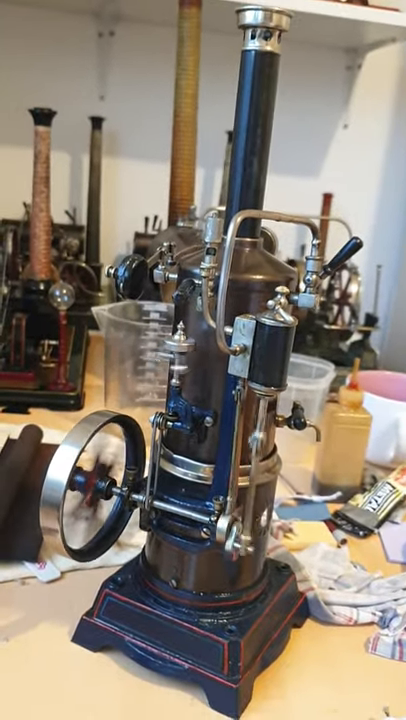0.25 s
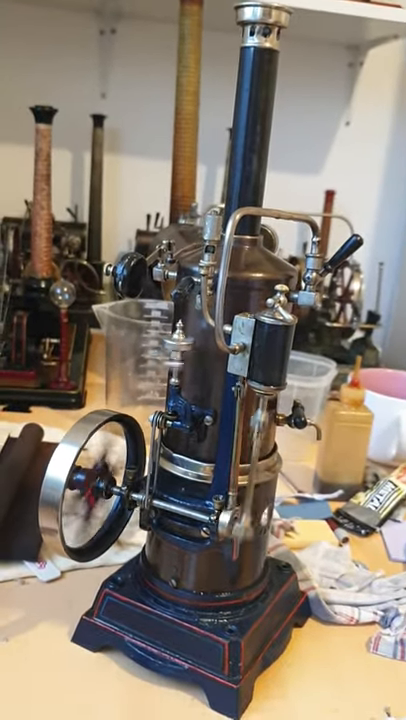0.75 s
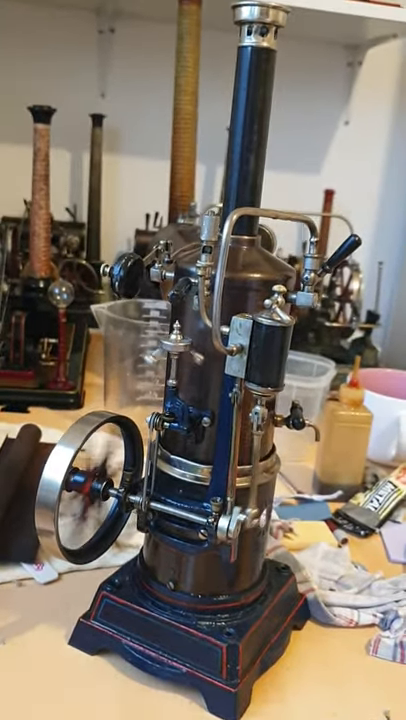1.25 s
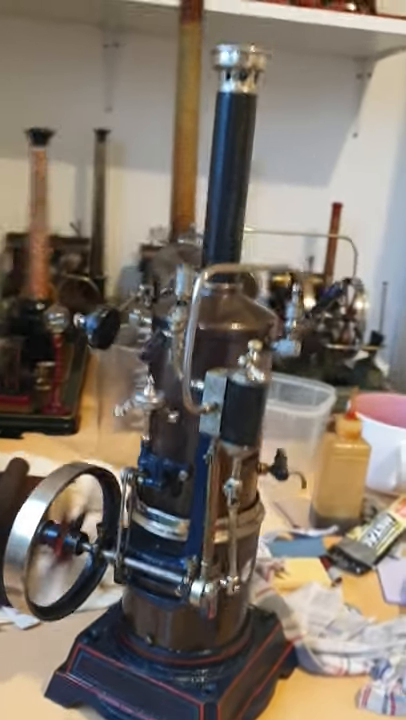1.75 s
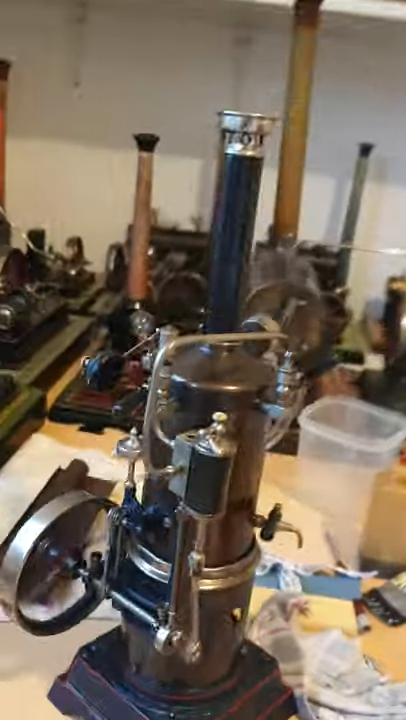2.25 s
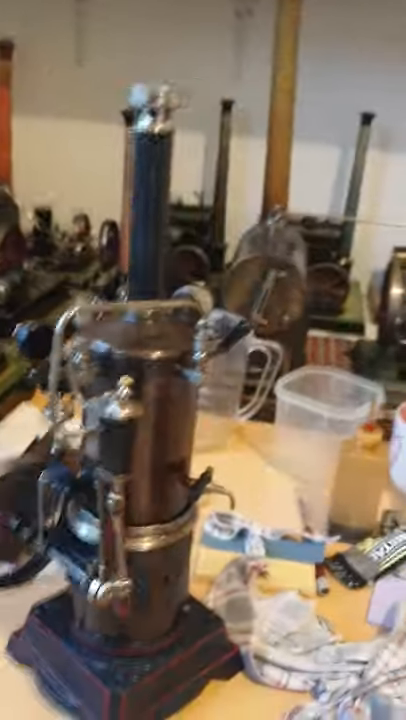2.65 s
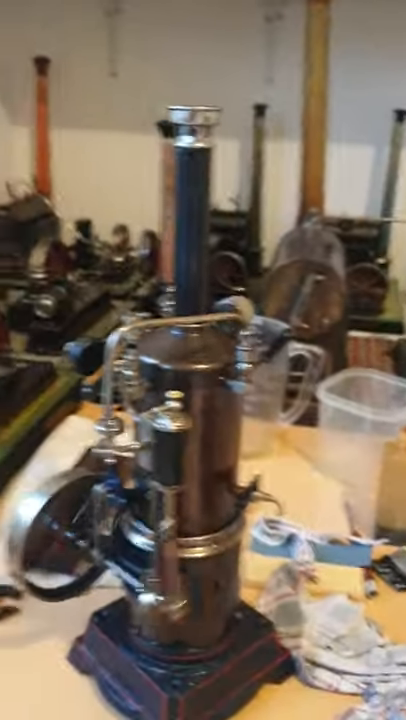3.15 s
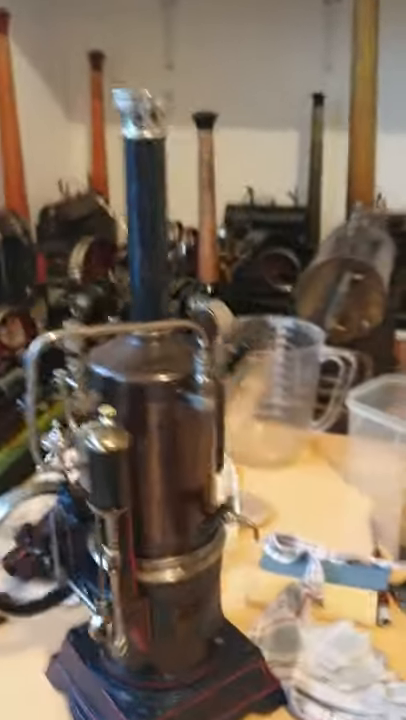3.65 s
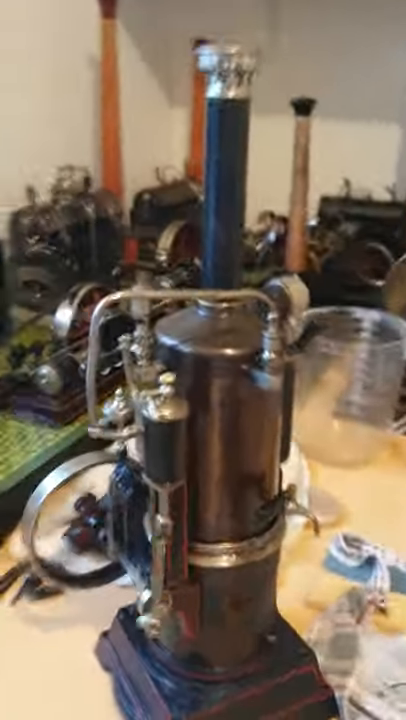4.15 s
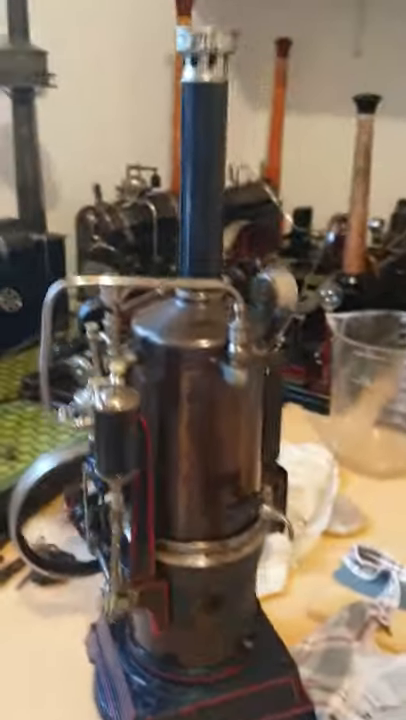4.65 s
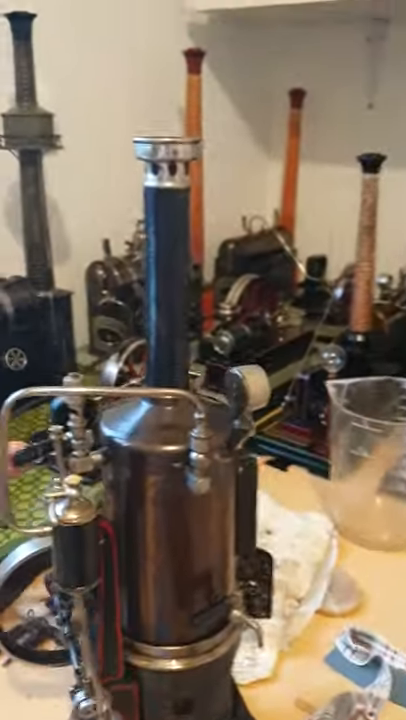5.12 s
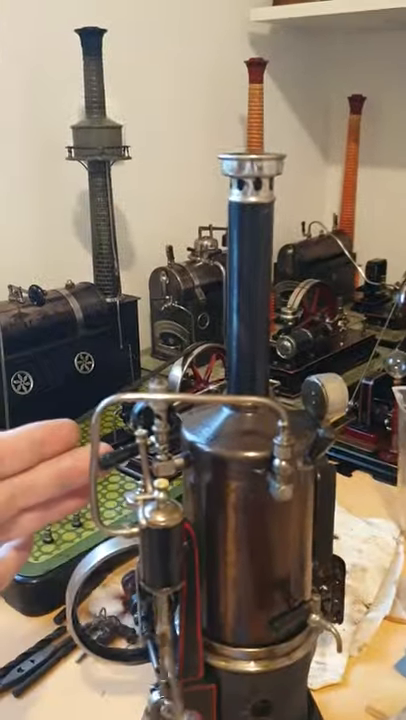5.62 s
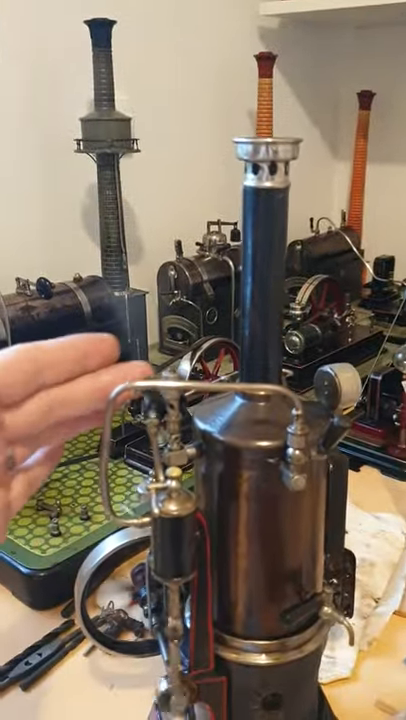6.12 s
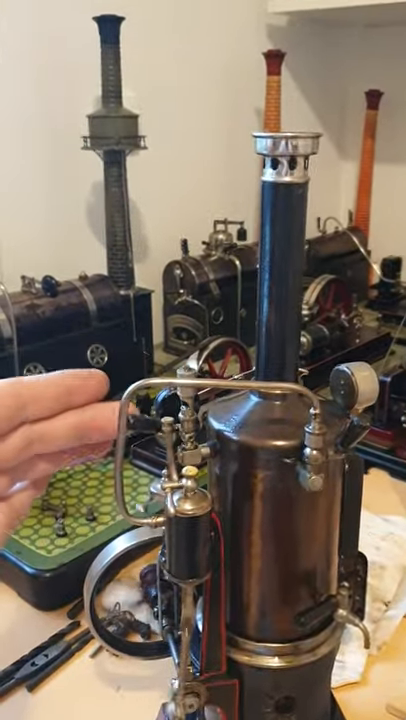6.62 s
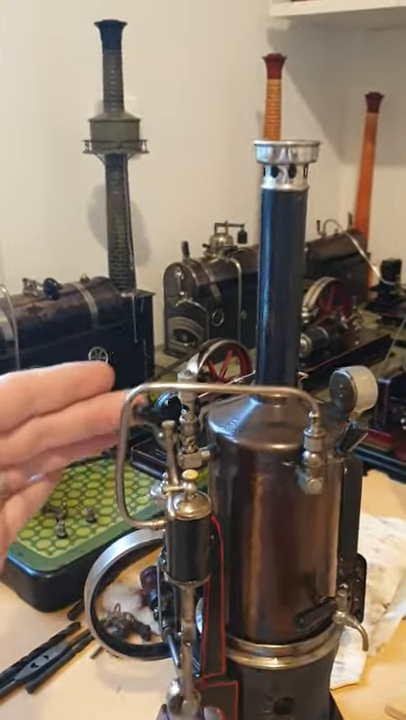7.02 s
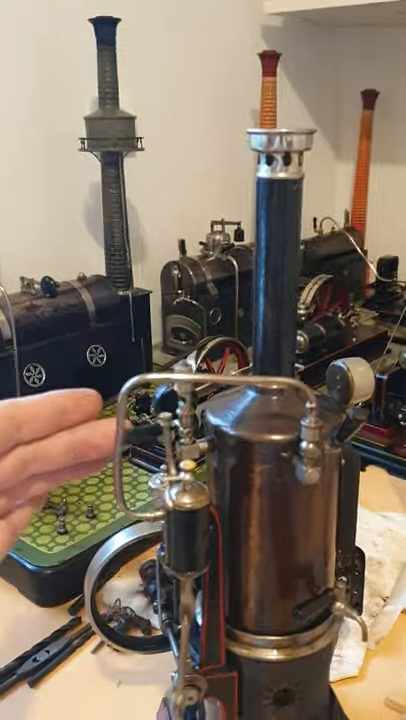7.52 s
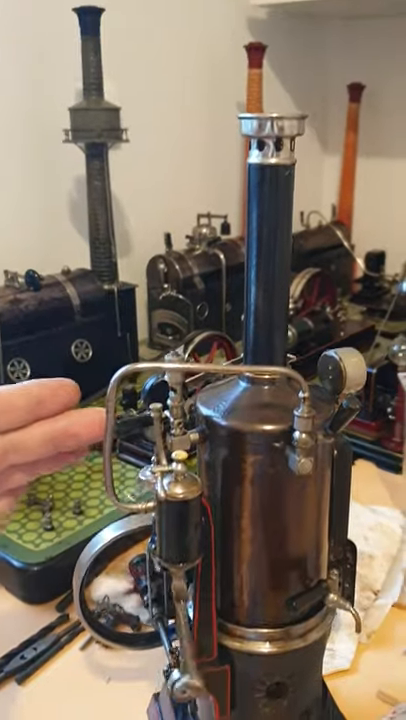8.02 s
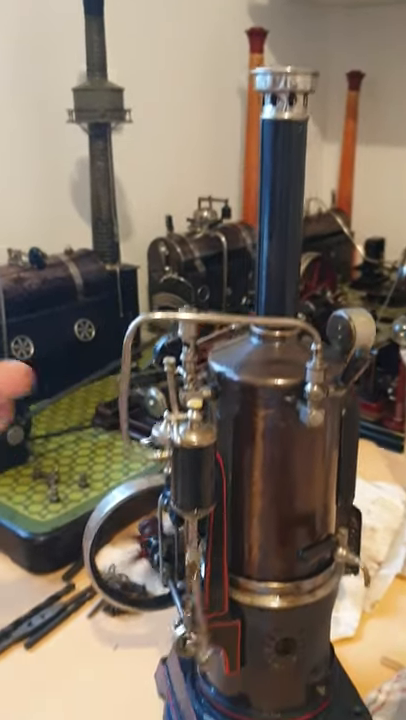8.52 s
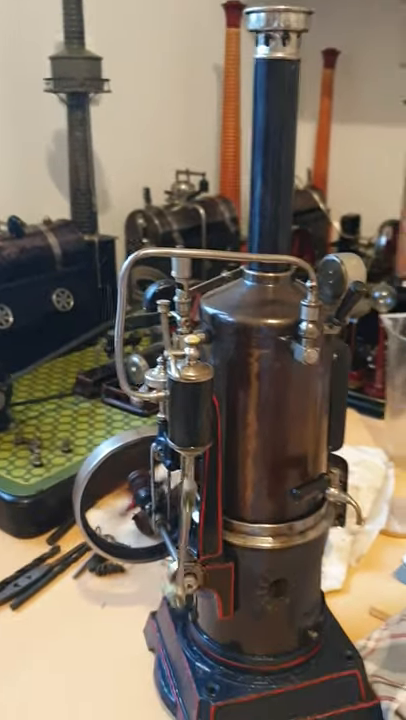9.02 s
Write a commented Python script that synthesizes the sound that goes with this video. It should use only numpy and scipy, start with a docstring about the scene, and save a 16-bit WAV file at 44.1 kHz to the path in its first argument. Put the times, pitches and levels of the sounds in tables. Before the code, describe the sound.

In a small room, a toy steam engine runs steadily on a wooden bench, five to six knocks a second, with valve ticks, loose rattle, pulsing steam hiss and wet spits. A hand-held stereo microphone moves round it closely, with faint handling bumps. Late on, two short piercing whistle toots burst out with spluttering steam; the engine drops in level beneath them, then slowly swells back, still running.

```python
"""Toy steam engine and whistle

A toy steam engine runs on a wooden bench in a small room, heard by a hand-held two-port microphone moving round it.
Each turn, impacts of crank and valve gear excite decaying modes of base and links, while filtered noise makes steam.
Clicks, gland spurts and low bumps are strewn over it; then an edge tone in jet noise toots twice.
A gain control ducks under the whistle and slowly lets the engine come back."""
import sys
import numpy as np
from scipy import signal
from scipy.fft import rfft, irfft, next_fast_len
from scipy.io import wavfile
from scipy.ndimage import uniform_filter1d, map_coordinates

SR = 44100
rng = np.random.default_rng(int(sys.argv[2]) if len(sys.argv) > 2 else 0)


def linear_from_db(decibels):
    """Turn decibels (scalar or array-like) into linear amplitude factors; 0 gives 1."""
    return 10 ** (np.asarray(decibels, float) / 20)


def transcribe(u):
    """Save the signal u as a 16-bit wav file named by the first command-line argument.

    u: samples, shape (n,) or (channels, n), limited to [-1, 1]; the rate is SR.
    q: integer samples, one column per channel.
    """
    v = np.clip(np.atleast_2d(u).T, -1, 1)
    q = np.round(v * 32767).astype(np.int16)
    wavfile.write(sys.argv[1], SR, q)


N = 408807

# flywheel speed, sagging once the whistle draws steam: t/s, speed/(turns per s)
FLYWHEEL_SPEED = [(0, 5.5536), (3, 5.631), (5, 5.6924), (6.3, 5.6714), (6.8, 5.5001), (9.3, 5.3157)]
FIRST_KNOCK_S = .0635
# strength of the crank knocks turn by turn, the last value held: level/dB
KNOCK_DB = [-31, -30.5, -31, -31.5, -33.5, -29, -29, -33.5, -31, -30, -31.5, -31.5, -30, -32, -29.5, -34.5,
            -29.5, -34, -30.5, -31.5, -29.5, -31, -32, -32.5, -30.5, -30, -29, -29.5, -30, -27.5, -28.5,
            -29.5, -30, -30, -30.5, -34.5, -27.5, -42, -36, -34, -29]
# slack in the crank pin, the knock and its bounces: t/s after the knock, front level/dB, side level/dB
BOUNCES = [(0, -11, -10), (.0055, -25, -11), (.02, -18.5, -25), (.029, -41.5, -18.5), (.048, -33, -18)]
# valve gear contacts within a turn: share of the turn, relative thud level/dB, relative tick level/dB
VALVE_CONTACTS = [(.515, -4.5, 2.5), (.585, -9.5, 6), (.625, -6.5, -3), (0.871, -17.5, -6),
                  (0.971, -33, -1)]
CONTACT_SCATTER = .004  # share of the turn
# course over a turn: share of the turn, relative loose rattle level/dB, relative steam level/dB
TURN_CYCLE = [(0, 12, 8.5), (.12, -1.5, 3), (.49, -5, 1), (.56, 7.5, 3), (.59, 7.5, 7), (.68, 3.5, 5),
              (.8, 2, 7.5), (1, -2, 2.5)]
# reference strengths; the contact and cycle tables vary round these
THUD_DB, TICK_DB, RATTLE_DB, CHATTER_DB = -40.5, -45.5, -52, -68
# the piston reverses and rocks the bench: share of the turn, level/dB
PISTON_PUSHES = [(0, -36.5), (.15, -45.5), (0.531, -41.5), (0.718, -40.5)]
# sway modes of the bench: f/Hz, level/dB, t60/s
BENCH_SWAY = [(106.6, -5, 0.13), (116, -4, .11)]
# modes of base plate and bench: f/Hz, front level/dB, side level/dB, t60/s before extra damping
BASE_MODES = [(113.6, -2.5, -8.5, 0.11), (186.8, -3, -8.5, 0.14), (236.5, -3.5, -6, 0.069),
              (381.6, -3, -4.5, 0.1), (444, 3, -10, 0.068), (590.5, -2.5, -5.5, 0.068),
              (670, 1, 1.5, 0.052), (759, 3.5, 2, 0.044), (910, -10.5, 1.5, 0.043), (1096, -21, -4, 0.05),
              (1235, -6, -4, 0.02), (1740, -19, -3.5, 0.0301)]
# modes of valve rod and links: f/Hz, level/dB, t60/s before extra damping
LINK_MODES = [(2367, -9.5, 0.012), (4490, -8.5, 0.0078), (5830, -10, 0.0064), (7440, -10, 0.007),
              (14400, -8, 0.00882)]
# walking round the engine: t/s, share seen from the side (0-1), body level/dB, left-right body level/dB,
# left-right level/dB of steam and ticks, bench sway level/dB
MICROPHONE_WALK = [(0, 0.31, 6, -0.5, 8.5, 2), (1.5, 0.26, 4.5, -1, 6.5, -3.5),
                   (2.5, 0.49, 6, 0, 1.5, -4.5), (3.7, 0.66, 4, 0.5, 0.5, -3.5), (5, 0.85, 2.5, 2, 4, -3.5),
                   (7.7, 0.93, 1, 0.5, 4.5, -13), (9.3, 0.75, 3, 1.5, 6, 0)]
# leaking steam, before its course over a turn: t/s, level/dB
STEAM_LEAK = [(0, -57.5), (2.62, -52.5), (4.74, -54), (9.3, -54)]
# spectrum of the leaking steam: f/Hz, relative level/dB per Hz
STEAM_SPECTRUM = [(530, -52), (900, -9), (1190, -13.5), (1740, -13), (2520, -15.5), (4330, -19),
                  (6510, -22.5), (7800, -20.5), (9000, -29.5), (12500, -23.5), (15800, -25)]

# whistle toots, valve open to start of closing; pitch follows steam pressure: t/s, f/Hz, tone level/dB before flutter
WHISTLE_TOOTS = [
    [(6.08, 3973, -64.5), (6.16, 5085, -57.5), (6.19, 5603, -7.5), (6.212, 5880, -8.5), (6.275, 5907, 2.5),
     (6.36, 6000, -2), (6.42, 5920, 6.5), (6.468, 5527, 2.5), (6.49, 5300, -9.5), (6.512, 4515, -26.5)],
    [(7.115, 4700, -82), (7.172, 5080, -53), (7.184, 5280, -14.5), (7.21, 5580, 1), (7.24, 5900, 2),
     (7.29, 5726, 6.5), (7.355, 5584, 0), (7.385, 5110, -22)],
]
VALVE_OPEN_S, VALVE_SHUT_S = 0.047, 0.024
FULL_HZ, JET_DB, JET_DB_PER_OCTAVE = 5900, -23, 28.5  # the jet is louder the higher the pressure
OCTAVE_DB, OCTAVE_GROWS = -22.5, 1.4  # the octave under a 0 dB tone, and dB per dB of tone
# spectrum of the whistle's steam jet: f/Hz, relative level/dB per Hz
JET_SPECTRUM = [(300, -13), (676, -22.5), (1330, -13), (2270, -8), (2960, -17.5), (4550, -2), (15800, -5)]
# water standing in the whistle pipe splutters out as it first opens
SPLUTTER_S, SPLUTTER_RISE_S, SPLUTTER_T60_S, SPLUTTER_DB = 6.078, 0.04, 0.59, -28.5
# spectrum of that spray: f/Hz, relative level/dB per Hz
SPRAY_SPECTRUM = [(600, -27.5), (2200, -6), (3300, -8), (4300, 2), (5500, -10.5), (9000, -22),
                  (15000, -18.5)]

# wet spits and sharp clicks, before a treble loss: t/s, strength level/dB, ring f/Hz
SPITS_AND_CLICKS = [(0.5354, -27.5, 1470), (0.758, -30, 1500), (1.0688, -23.5, 1620), (1.192, -22, 1520),
                    (0.941, -28, 1500), (1.2692, -24, 1580), (1.283, -30, 1600), (1.423, -36.5, 6100),
                    (1.8133, -31.5, 1400), (1.929, -28, 1440), (2.492, -22.5, 1640), (2.7998, -27, 7240),
                    (2.855, -25, 1590), (2.8718, -28, 4250), (3.07, -24.5, 2480), (3.8646, -25.5, 2600),
                    (4.401, -25, 6700), (4.4697, -29, 4500), (4.9288, -26, 1980), (5.7986, -23.5, 2100),
                    (6.0307, -21, 2070), (6.6817, -23.5, 2070), (6.7795, -23.5, 1500), (7.653, -25, 1440),
                    (7.679, -24.5, 1500), (7.7774, -27.5, 1507), (8.6947, -25, 1390), (8.7944, -27, 2090)]
# spurts of steam from the gland: t/s, length/s, starting level/dB before flicker
GLAND_SPURTS = [(1.188, 0.2, -48.5), (2.498, 0.24, -47), (4.403, 0.078, -50.5), (4.466, 0.072, -48),
                (5.03, 0.33, -50.5)]
# spectrum of the spurts: f/Hz, relative level/dB per Hz
SPURT_SPECTRUM = [(2200, -12), (3600, -5.5), (5000, -5), (6500, -19)]
# low bumps of the hand on the microphone: t/s, relative level/dB
HAND_BUMPS = [(1.246, -28), (2.49, -23), (2.898, -26), (3.824, -26), (4.248, -21.5)]
TAP_S, TAP_DB = 2.491, -6  # a fingernail on the right port, before its treble loss
# decay of the room: f/Hz, t60/s
ROOM_DECAY = [(100, 0.86), (1000, 0.24), (5800, 0.49), (12000, 0.29)]


def unit(x):
    """Normalisation to rms 1."""
    return x / np.sqrt(np.mean(x ** 2) + 1e-20)


def along(points, hz):
    """Interpolation of (f/Hz, value) points on a logarithmic frequency axis."""
    f, v = np.transpose(points)
    return np.interp(np.log(hz + 1), np.log(f + 1), v)


def curves(rows):
    """Linear interpolation in time: one value per sample for each column after t/s."""
    s, *columns = np.transpose(rows)
    return [np.interp(np.arange(N) / SR, s, column) for column in columns]


def wobble(rate):
    """Band-limited random modulation: a smooth curve through rate random knots a second."""
    knots = rng.standard_normal(int(N * rate / SR) + 4)
    return map_coordinates(knots, [np.arange(N) * rate / SR])


def filtered(x, response):
    """Linear filtering: the spectrum of x times a complex response of frequency."""
    m = next_fast_len(N + SR // 2)
    return irfft(rfft(x, m) * response(np.fft.rfftfreq(m, 1 / SR)), m)[..., :N]


def hiss(spectrum, patchy_db):
    """Turbulence noise: uncorrelated ports, patches of random gain in time and frequency, rms 1."""
    z = signal.stft(rng.standard_normal((2, N)), nperseg=512)[2]
    field = rng.standard_normal(z.shape[1:])
    field = uniform_filter1d(uniform_filter1d(field, 10, 0), 8, 1)
    pair = signal.istft(z * linear_from_db(patchy_db * unit(field)), nperseg=512)[1][:, :N]
    return unit(filtered(pair, lambda hz: linear_from_db(along(spectrum, hz))))


def ring(modes, lag, damping, flip):
    """Modal superposition: damped sines, with random port phase differences of about lag rad/kHz.

    Each mode's amplitude is multiplied by flip once more than the one before; damping divides every t60."""
    t = np.arange(SR // 3) / SR
    hz, db, t60 = np.transpose(modes)[:, :, None]
    turn = hz / 1000 * lag * rng.standard_normal(hz.shape)
    sign = flip ** np.arange(len(hz))[:, None]
    envelope = sign * linear_from_db(db - 60 * damping * t / t60)
    return np.array([np.sum(envelope * np.sin(2 * np.pi * hz * t + side * turn), 0) for side in (-.5, .5)])


def blows(times, dbs):
    """Impulsive excitation: a train of single-sample blows."""
    at = np.round(np.ravel(times) * SR).astype(int)
    keep = (at >= 0) & (at < N)
    return np.bincount(at[keep], linear_from_db(np.ravel(dbs))[keep], N)


def through(x, response):
    """Convolution: an excitation x sounds an impulse response."""
    return signal.fftconvolve(np.atleast_2d(x), response, axes=1)[:, :N]


def engine():
    """Forced vibration by periodic impacts: contacts ring base and links; rattle and steam follow the crank angle."""
    marks = crank()
    start, length = marks[:-1, None], np.diff(marks)[:, None]
    share, thud_db, tick_db = np.transpose(VALVE_CONTACTS)
    chance = np.clip(rng.standard_normal((3, len(start), len(share))), -2, 2)
    times = start + length * (share + CONTACT_SCATTER * chance[0])
    angle = np.interp(np.arange(N) / SR, marks, np.arange(len(marks))) % 1
    cycle_share, *cycle_dbs = np.transpose(TURN_CYCLE)
    rattle_db, steam_db = (np.interp(angle, cycle_share, column) for column in cycle_dbs)
    # loose parts chatter: about 700 small blows a second
    chatter = (rng.random(N) < 700 / SR) * rng.standard_normal(N)
    # the valve contacts are duller than the crank knock
    thuds = blows(times, THUD_DB + thud_db + 3.4 * chance[1])
    thuds = filtered(thuds, lambda f: 1 / (1 + 1j * f / 900))
    rattle = chatter * linear_from_db(RATTLE_DB + rattle_db + 0.46 * wobble(15.0))
    ticks = blows(times, TICK_DB + tick_db + 3.8 * chance[2])
    _, body_db, pan_db, _, sway_db = curves(MICROPHONE_WALK)
    base = bench_sway(start, length, chance, sway_db) + base_plate(start, thuds, rattle)
    body = base * linear_from_db([pan_db / 2, -pan_db / 2])
    return linear_from_db(body_db) * body, linear_from_db(body_db) * links(ticks, chatter, steam_db) + leaking_steam(steam_db)


def crank():
    """Integration of angular speed: knock times, one a turn, from one before the start to beyond the end."""
    t = np.arange(-SR // 2, N + SR // 2) / SR
    turns = np.cumsum(np.interp(t, *np.transpose(FLYWHEEL_SPEED))) / SR
    turns = turns - np.interp(FIRST_KNOCK_S, t, turns)
    return np.interp(np.arange(-1, np.ceil(turns[N + SR // 2]) + 1), turns, t)


def base_plate(start, thuds, rattle):
    """Modal radiation: knocks, thuds and rattle ring the base, crossfaded from front to side view."""
    side = curves(MICROPHONE_WALK)[0]
    after = np.array(BOUNCES)[:, 0]
    slack = rng.standard_normal((len(start), len(BOUNCES)))
    knock_db = np.interp(np.arange(len(start)) - 1, np.arange(len(KNOCK_DB)), KNOCK_DB)
    knock_times = start + after * (1 + .05 * slack)

    def hard(f):
        """Resonant contact spectrum: the hard crank knock favours the middle modes."""
        return (0.11 + 1j * f * 900 / (800 ** 2 - f * f + 1j * f * 900)) / (1 + 1j * f / 1800) ** 2

    base = 0
    for seen, view in ((1 - side, 1), (side, 2)):
        modes = np.array(BASE_MODES)[:, [0, view, 3]]
        bounce_db = np.array(BOUNCES)[:, view] + 3 * (after > 0) * slack
        knocks = filtered(blows(knock_times, knock_db[:, None] + bounce_db), hard)
        base = base + through(knocks * seen, ring(modes, lag=.9, damping=1.1, flip=1))
        base = base + through(thuds * seen, ring(modes, lag=1.2, damping=1.5, flip=-1))
        base = base + through(rattle * seen, ring(modes, lag=1.5, damping=2.8, flip=-1))
    return base


def bench_sway(start, length, chance, sway_db):
    """Inertial reaction: the reversing piston pushes the low modes of the bench."""
    share, push_db = np.transpose(PISTON_PUSHES)
    times = start + length * (share + 0.005 * chance[0, :, :4])
    pushes = blows(times, push_db + 3 * chance[2, :, :4]) * linear_from_db(sway_db)
    return through(pushes, ring(BENCH_SWAY, lag=4, damping=1, flip=0.98))


def links(ticks, chatter, steam_db):
    """Modal response of light parts: valve ticks and loose chatter ring the rod and links."""
    ticking = through(ticks, ring(LINK_MODES, lag=.2, damping=1, flip=-1))
    # the cube makes the strong blows stand out
    loose = np.clip(chatter, -2, 2) ** 3 * linear_from_db(CHATTER_DB + steam_db + 4 * wobble(6))
    return ticking + through(loose, ring(LINK_MODES[:4], lag=.5, damping=3, flip=-1))


def leaking_steam(steam_db):
    """Turbulent jet noise, amplitude-modulated by the crank angle."""
    return linear_from_db(curves(STEAM_LEAK)[0] + steam_db + wobble(15)) * hiss(STEAM_SPECTRUM, patchy_db=1.9)


def whistle():
    """Edge-tone oscillation: an unsteady tone with its octave, in the noise of the steam jet."""
    hz, tone_db = curves(sum(WHISTLE_TOOTS, []))
    t = np.arange(N) / SR
    valve = 0
    for rows in WHISTLE_TOOTS:
        opening = np.clip((t - rows[0][0]) / VALVE_OPEN_S, 0, 1) ** 2
        closing = np.clip((rows[-1][0] - t) / VALVE_SHUT_S + 1, 0, 1) ** 2
        valve = valve + opening * closing
    jet_db = JET_DB + JET_DB_PER_OCTAVE * np.log2(hz / FULL_HZ)
    waver = .002 * wobble(60) + .003 * wobble(300)
    phase = 2 * np.pi * np.cumsum(hz * (1 + waver)) / SR
    flutter_db = 3 * wobble(100)
    tone = linear_from_db(tone_db + flutter_db) * np.sin(phase + np.array([[0], [2.2]]))
    octave = linear_from_db(OCTAVE_DB + OCTAVE_GROWS * tone_db + flutter_db) * np.sin(2 * phase)
    # turbulence spreads a skirt of noise round the tone, and the pipe colours the jet before it speaks
    skirt = (linear_from_db(tone_db - 27.5) + linear_from_db(jet_db - 0.5)) * np.array([wobble(1400), wobble(1500)]) * np.sin(phase)
    jet = linear_from_db(jet_db + 1.8 * wobble(30)) * hiss(JET_SPECTRUM, patchy_db=3.5)
    # the blast of steam buffets the ports
    buffeting = hiss([(25, -10), (60, 4), (150, -9.0), (400, -32.5)], patchy_db=1.5)
    rumble = linear_from_db(tone_db - 33.5) * buffeting
    return valve * (tone + octave + skirt + jet), valve * rumble


def splutter():
    """Two-phase flow noise: a rough burst of spray that swells and decays exponentially."""
    t = np.arange(N) / SR - SPLUTTER_S
    rise = np.clip(t / SPLUTTER_RISE_S, 0, 1)
    decay = linear_from_db(-60 * np.clip(t - SPLUTTER_RISE_S, 0, None) / SPLUTTER_T60_S)
    return rise * decay * linear_from_db(SPLUTTER_DB + 1.5 * wobble(120)) * hiss(SPRAY_SPECTRUM, patchy_db=2.5)


def spits():
    """Transient excitation: a sharp noise click, a short damped sine and a puff of spray."""
    out, t = np.zeros((2, N + SR)), np.arange(SR // 10) / SR
    for s, db, hz in SPITS_AND_CLICKS:
        noise = rng.standard_normal((2, len(t)))
        click = noise * 0.63 * linear_from_db(-60 * t / 0.01)
        puff = noise * 0.12 * linear_from_db(-60 * t / 0.06)
        # the ring falls 60 dB in 15 periods
        tone = .42 * linear_from_db(-60 * t * hz / 15) * np.sin(2 * np.pi * hz * t)
        out[:, round(s * SR):][:, :len(t)] += linear_from_db(db) * (click + puff + tone)
    return filtered(out[:, :N], lambda f: 1 / (1 + 1j * f / 6000) ** 2)


def spurts():
    """Transient jet noise: each spurt starts at once and thins out parabolically over its length."""
    t = np.arange(N) / SR
    shape = sum(linear_from_db(db) * (t > s) * np.clip(1 - ((t - s) / length) ** 2, 0, 1) for s, length, db in GLAND_SPURTS)
    return shape * linear_from_db(2.5 * wobble(60)) * hiss(SPURT_SPECTRUM, patchy_db=2.2)


def bumps():
    """Handling noise: low pressure pulses, stronger on the right port, and one tap clicking mostly there."""
    s, db = np.transpose(HAND_BUMPS)
    u = np.arange(SR // 8) / SR / 0.0017
    pulse = (1 - u) * u * np.exp(-u) * linear_from_db([[-3], [1.5]])
    tap = filtered(blows([TAP_S], [TAP_DB]), lambda f: -1 / (1 + 1j * f / 5000)) * linear_from_db([[-13], [0]])
    return tap + through(blows(s, db + 10.0), pulse)


def room(x, gap_s):
    """Diffuse reverberation: decay depends on frequency; only the bass is alike at both ports."""
    hz, t, z = signal.stft(rng.standard_normal((2, SR)), SR, nperseg=256)
    apart = np.clip(hz / 1300, 0, 1)[:, None]
    z = np.array([z[0] + apart * z[1], z[0] - apart * z[1]]) / np.sqrt(1 + apart ** 2)
    decay = linear_from_db(-60 * t / along(ROOM_DECAY, hz)[:, None])
    tail = signal.istft(z * decay, SR, nperseg=256)[1]
    tail = np.pad(tail / np.linalg.norm(tail[0]), [(0, 0), (round(gap_s * SR), 0)])
    return through(x, tail)


def low_floor():
    """Stationary background noise: a low, uncorrelated floor."""
    spectrum = [(25, -15.5), (55, -2.5), (90, -25.0), (300, -0.5), (2000, -19.0), (16000, -66.0)]
    return linear_from_db(-48.5) * hiss(spectrum, patchy_db=3.5)


def scene():
    """Superposition: near sounds, the room's answer and a low floor."""
    body, steam = engine()
    toots, rumble = whistle()
    clicks = spits()
    toots = toots + linear_from_db(-0.5) * room(toots[0], gap_s=0.0066)
    # a hand by the whistle shades its treble from the right port
    toots = filtered(toots, lambda f: linear_from_db(along([(6500, 0.02), (9000, 0.88)], f) * [[2.5], [-8]]))
    # the moving microphone hears the room anew every few turns
    places = np.cos(np.pi * np.arange(N) / SR * 1.3) ** 2
    sent = body.mean(0) + .5 * clicks[0]
    wet = linear_from_db(-2.5) * sum(room(sent * share, gap_s=.008) for share in (places, 1 - places))
    pan_db = curves(MICROPHONE_WALK)[3]
    panned = (steam + spurts() + clicks) * linear_from_db([pan_db / 2, -pan_db / 2])
    return body + panned + toots + rumble + splutter() + wet + bumps() + low_floor()


def gain_control(x, top_db, attack, release_db):
    """Feedback compression: gain falls at attack dB/s per dB of excess, less a steady release_db dB/s."""
    step = SR // 200  # about 5 ms
    power = np.abs(uniform_filter1d(np.mean(x ** 2, 0), 8 * step))[::step]
    level_db = 10 * np.log10(power + 1e-12)
    gain_db = np.zeros(len(level_db))
    for k in range(1, len(gain_db)):
        excess = np.clip(level_db[k] + gain_db[k - 1] - top_db, 0, None)
        gain_db[k] = min(0, gain_db[k - 1] + (release_db - attack * excess) * step / SR)
    return x * linear_from_db(np.interp(np.arange(N), step * np.arange(len(gain_db)), gain_db))


def band_limit(x):
    """A steep low-pass at the top of the band."""
    return signal.sosfilt(signal.butter(12, 15950, fs=SR, output="sos"), x)


def record(dry):
    """Microphone transduction: a bass cut, a little deeper on the left, gain control and a soft ceiling."""
    x = filtered(dry, lambda f: (1j * f / (np.array([[72], [58]]) + 1j * f)) ** 2)
    x = gain_control(x, top_db=-16.5, attack=12.1, release_db=4.0)
    mix = x / (1 + np.abs(x) ** 8) ** (1 / 8)
    return band_limit(mix)


dry = scene()
out = record(dry)
transcribe(out)
```